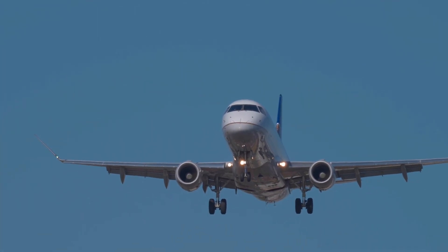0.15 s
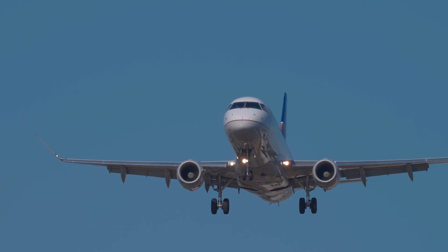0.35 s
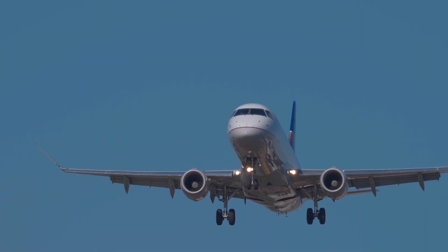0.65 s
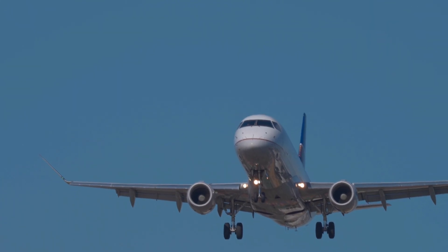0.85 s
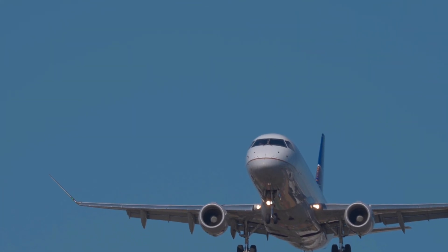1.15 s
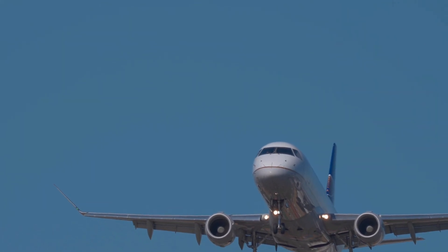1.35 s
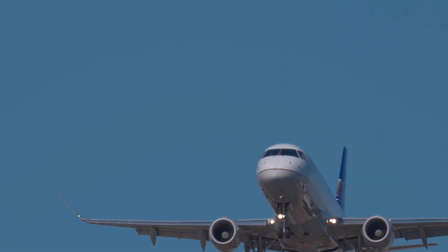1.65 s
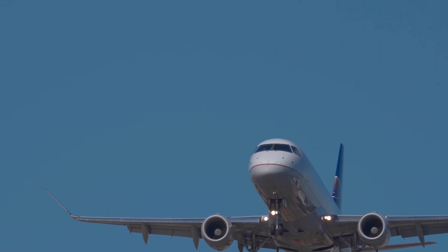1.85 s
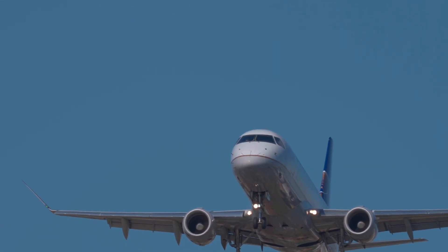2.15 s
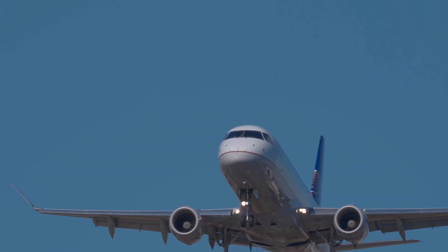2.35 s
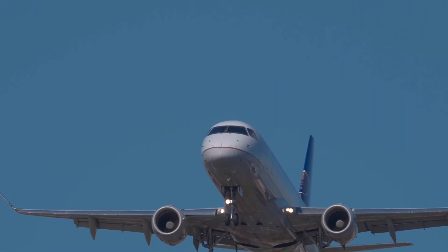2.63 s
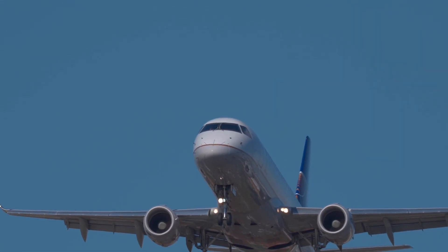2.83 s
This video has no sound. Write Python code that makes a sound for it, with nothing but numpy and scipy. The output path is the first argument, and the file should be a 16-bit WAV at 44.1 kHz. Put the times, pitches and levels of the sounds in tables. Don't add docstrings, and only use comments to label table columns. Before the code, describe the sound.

Jet airliner approaches head-on to land, its roar swelling over wind buffeting the microphone

```python
import sys
import numpy as np
from scipy import signal
from scipy.fft import rfft, irfft, next_fast_len
from scipy.io import wavfile
from scipy.ndimage import uniform_filter1d, map_coordinates

SR = 44100
rng = np.random.default_rng(int(sys.argv[2]) if len(sys.argv) > 2 else 0)


def int16_out(signal):
    q = np.round(np.clip(np.atleast_2d(signal).T, -1, 1) * 32767)
    wavfile.write(sys.argv[1], SR, q.astype(np.int16))


def volts_from_decibels(level):
    exponent = np.asarray(level, float) / 20
    return 10 ** exponent


N = 131859
T = np.arange(N) / SR

# [t/s, level/dB]
ROAR_LEVEL = [(0.0, -64.5), (0.01, -64.5), (0.6, -61), (1.67, -53.5), (1.91, -53), (2.32, -45.5),
              (2.59, -47.5), (2.66, -46.5), (2.8, -48), (2.87, -45.5), (2.91, -45), (2.99, -45.5)]
# [f/Hz, density/dB per Hz]
ROAR_SPECTRUM = [(300, -17.5), (450, -11), (1000, -8.5), (1550, -3), (2300, -8.5), (3400, -19), (4700, -33),
                 (5400, -55)]
# [f/Hz, correlation/1]
ROAR_ALIKE = [(300, 0.77), (1500, 0.8), (3000, 0.52), (6000, 0.47)]
# [t/s, f/Hz, level/dB]
FAN = [(0, 2155, -60), (.35, 2150, -63), (.65, 2146, -56), (1.15, 2154, -57), (1.4, 2172, -63),
       (1.6, 2195, -57), (1.85, 2208, -58), (2.05, 2220, -62), (2.2, 2231, -52), (2.4, 2239, -58),
       (2.6, 2245, -57), (2.75, 2250, -48), (2.99, 2259, -46)]
# [f/Hz, density/dB per Hz]
DRONE_SPECTRUM = [(350, -22.5), (600, -8), (950, -5.5), (1500, -9), (2200, -15), (3300, -28), (4500, -36.5),
                  (6500, -53.5)]
# [f/Hz, correlation/1]
DRONE_ALIKE = [(400, 1), (1000, .65), (2000, .55), (4000, 0.12)]
# [t/s, gust level/dB, pressure level/dB]
WIND = [(0, -49, -44.5), (.33, -53.5, -47.5), (.56, -40.5, -40), (.82, -32, -40), (1.02, -42, -47),
        (1.15, -34, -37.5), (1.23, -38.5, -45), (1.35, -36.5, -44.5), (1.5, -43.5, -43), (1.8, -53, -48),
        (1.9, -42, -47.5), (2.05, -53, -43.5), (2.27, -48.5, -43), (2.41, -44, -41.5), (2.54, -55.5, -52),
        (2.72, -49, -44), (2.8, -54, -46.5), (2.99, -59, -47.5)]
# [f/Hz, density/dB per Hz]
RUMBLE_SPECTRUM = [(15, -7.5), (30, 0), (80, -2), (130, -6.5), (200, -12.5), (350, -21.5), (600, -55)]
# [f/Hz, correlation/1]
RUMBLE_ALIKE = [(30, 0.97), (100, 0.83), (250, 0.91)]
# [f/Hz, density/dB per Hz]
FLUTTER_SPECTRUM = [(30, -16), (100, -6), (200, -2.5), (350, -6.5), (600, -11.5), (900, -14), (1400, -40.5),
                    (2500, -48.5)]
# [f/Hz, correlation/1]
FLUTTER_ALIKE = [(80, 0.57), (250, .65), (600, 0.21), (1500, 0.23)]
# [t/s, level/dB]
GRASS_LEVEL = [(0, -68), (.06, -79.5), (.55, -81), (.83, -68.5), (1.02, -74.5), (1.4, -79), (1.65, -86),
               (2.2, -91)]
# [f/Hz, density/dB per Hz]
BLADES_SPECTRUM = [(2500, -7.5), (4000, -3), (5500, -0.5), (6800, -4), (7600, -7), (8400, -17.5),
                   (10000, -32)]
# [t/s, length/s, f/Hz, width/Hz, level/dB]
HOWLS = [
    (.1, .4, 955, 260, -53),
    (1.38, .4, 1915, 300, -47),
    (1.93, .24, 1965, 200, -53),
    (2.24, .43, 1860, 320, -42),
    (2.62, .5, 1480, 380, -43),
    (2.42, .42, 1269, 20, -50),
    (2.2, .2, 2400, 300, -53),
    (2.78, .25, 2100, 400, -50),
]
# [t/s, peak level/dB, f/Hz]
THUMPS = [(.11, -27, 75), (0.279, -33.5, 110), (.52, -35, 60), (.59, -31, 100), (.665, -32, 60),
          (.78, -24.5, 95), (0.832, -33, 110), (.885, -30, 80), (1.17, -28, 65), (1.28, -31.5, 90),
          (1.33, -30, 70), (1.38, -28, 50), (1.428, -28, 54.3), (1.65, -35, 49.7), (1.935, -26, 80),
          (2.272, -31, 75), (2.4, -31, 59.6), (2.783, -26.5, 94), (2.9, -34.5, 70)]
# [t/s, length/s, f/Hz, width/Hz, level/dB]
WHISTLES = [
    (1.25, 0.039, 583, 420, -36),
    (1.295, 0.04, 600, 420, -38.5),
    (1.33, .025, 616, 270, -31),
    (1.18, .2, 556, 570, -41.5),
]
# [t/s, level/dB]
WHINE_LEVEL = [(2.12, -125), (2.18, -97), (2.44, -97), (2.55, -106), (2.66, -99), (2.72, -125)]


def unit(x):
    return x / np.sqrt(np.mean(x ** 2) + 1e-20)


def along(points, hz):
    f_hz, value = np.transpose(points)
    return np.interp(np.log(hz + 1), np.log(f_hz + 1), value)


def curves(rows):
    t_s, *columns = np.transpose(rows)
    return [np.interp(T, t_s, column) for column in columns]


def wobble(rate_hz):
    return map_coordinates(rng.standard_normal(1200), [np.clip(T * rate_hz, 0, 1190)])


def filtered(x, response):
    pad = SR // 10
    size = next_fast_len(N + SR // 2)
    x = np.pad(x, [(0, 0), (pad, pad)], "reflect")
    spectrum = rfft(x, size) * response(np.fft.rfftfreq(size, 1 / SR))
    return irfft(spectrum, size)[..., pad:pad + N]


def placed(pair, pan_db, lag_samples):
    side = np.array([[-.5], [.5]])
    return filtered(pair, lambda hz: volts_from_decibels(pan_db * side) * np.exp(2j * np.pi * hz * lag_samples * side / SR))


def rush(spectrum, alike, patchy_db, pulses_per_s=SR):
    hits = rng.random(N + 512) < pulses_per_s / SR
    z = signal.stft(hits * rng.standard_normal((2, N + 512)), nperseg=512)[2]
    patches = uniform_filter1d(rng.standard_normal(z.shape[1:]), size=4, axis=0)
    patches = uniform_filter1d(patches, size=20, axis=1)
    pair = signal.istft(z * volts_from_decibels(patchy_db * unit(patches)), nperseg=512)[1][:, :N]
    shape = [(spectrum[0][0] / 2, -90)] + list(spectrum) + [(spectrum[-1][0] * 2, -120)]

    def mid_side(hz):
        turn = np.arccos(np.clip(along(alike, hz), -1, 1)) / 2
        return volts_from_decibels(along(shape, hz)) * [np.cos(turn), np.sin(turn)]

    mid, side = filtered(pair, mid_side)
    return unit(np.array([mid + side, mid - side]))


def bursts(rows, spread):
    out = np.zeros((2, N))
    for start_s, length_s, f_hz, width_hz, level_db in rows:
        def resonance(hz):
            damping = 1j * hz * width_hz
            return (damping / (f_hz * f_hz - hz * hz + damping)) ** 3

        mid, side = filtered(rng.standard_normal((2, N)), resonance)
        swell = np.sin(np.pi * np.clip((T - start_s) / length_s, 0, 1)) ** .6
        out += volts_from_decibels(level_db) * swell * unit(np.array([mid + spread * side, mid - spread * side]))
    return out


def from_jet(pair):
    return placed(pair, pan_db=2.5, lag_samples=1)


def roar():
    level_db, = curves(ROAR_LEVEL)
    noise = rush(ROAR_SPECTRUM, ROAR_ALIKE, patchy_db=1.5)
    return from_jet(volts_from_decibels(level_db + 9 + 0.34 * wobble(6.99)) * noise)


def fan():
    drift_hz, flicker_db, overtone_db = 1.5, 1.6, -28.5
    f_hz, level_db = curves(FAN)
    phase = 2 * np.pi * np.cumsum(f_hz + drift_hz * wobble(25)) / SR

    def flicker():
        per_port = np.array([wobble(6.4), wobble(4.7)])
        return volts_from_decibels(level_db + flicker_db * (wobble(14) + 0.61 * per_port))

    tone = flicker() * np.sin(phase)
    overtone = volts_from_decibels(overtone_db) * flicker() * np.sin(2 * phase)
    return from_jet(np.sqrt(2) * (tone + overtone))


def drone():
    level_db = -44 + .6 * wobble(4)
    return placed(volts_from_decibels(level_db) * rush(DRONE_SPECTRUM, DRONE_ALIKE, patchy_db=1.0), pan_db=6.5, lag_samples=3)


def rumble():
    pressure_db = curves(WIND)[1]
    noise = rush(RUMBLE_SPECTRUM, RUMBLE_ALIKE, patchy_db=-1.0)
    return volts_from_decibels(3 + pressure_db) * unit(volts_from_decibels(1.2 * wobble(18)) * noise)


def flutter():
    level_db, gust_exponent, eddies_per_s = -44.5, 1.11, 900
    gust_db = curves(WIND)[0]
    gust_db = gust_db - gust_db.mean()
    lumps = volts_from_decibels(1.45 * wobble(29.9) + 0.98 * np.array([wobble(40), wobble(40.83)]))
    eddies = rush(FLUTTER_SPECTRUM, FLUTTER_ALIKE, patchy_db=-0.06, pulses_per_s=eddies_per_s)
    eddies = placed(eddies, pan_db=1.5, lag_samples=-28)
    return volts_from_decibels(level_db + gust_exponent * gust_db) * unit(lumps * eddies)


def grass():
    fade_db_per_s = -17
    level_db, = curves(GRASS_LEVEL)
    level_db = level_db + fade_db_per_s * np.maximum(T - GRASS_LEVEL[-1][0], 0)
    noise = rush(BLADES_SPECTRUM, [(4000, 0.24), (8000, 0.17)], patchy_db=1.5)
    return placed(volts_from_decibels(level_db + 4 + 0.76 * wobble(30)) * noise, pan_db=8.0, lag_samples=0)


def howls():
    return from_jet(bursts(HOWLS, spread=0.11))


def thumps():
    width_cycles = .6
    t_s, peak_db, f_hz = np.transpose(THUMPS)[:, :, None]
    cycles = (T - t_s) * f_hz
    phase = rng.uniform(0, 2 * np.pi, t_s.shape)
    pulses = volts_from_decibels(peak_db) * np.exp(-(cycles / width_cycles) ** 2) * np.sin(2 * np.pi * cycles + phase)
    return np.sum(pulses, axis=0)


def whistles():
    return volts_from_decibels(wobble(70)) * bursts(WHISTLES, spread=0.72)


def scene():
    airliner = roar() + fan() + howls()
    wind = rumble() + flutter() + thumps() + whistles()
    return airliner + drone() + wind + grass()


def band_limit(x):
    return signal.sosfilt(signal.butter(12, 15570, fs=SR, output="sos"), x)


def record(dry):
    whine_hz, hiss_db, edge_s = 15517, -84, .004
    whine = volts_from_decibels(curves(WHINE_LEVEL)[0] + 4 * wobble(25)) * np.sin(2 * np.pi * whine_hz * T)
    hiss = filtered(rng.standard_normal(dry.shape), lambda hz: hz < 14800)
    hiss = volts_from_decibels(hiss_db + np.array([[-.9], [.9]])) * hiss
    ends = np.sin(np.pi / 2 * np.clip(np.minimum(3 * T, T[::-1]) / edge_s, 0, 1))
    return band_limit(ends * (dry + hiss + whine))


dry = scene()
out = record(dry)
int16_out(out)
```